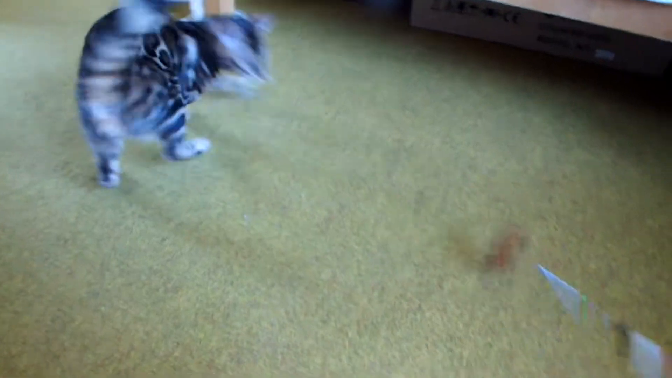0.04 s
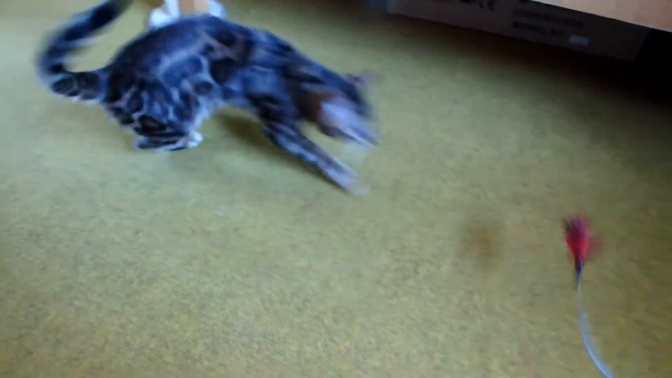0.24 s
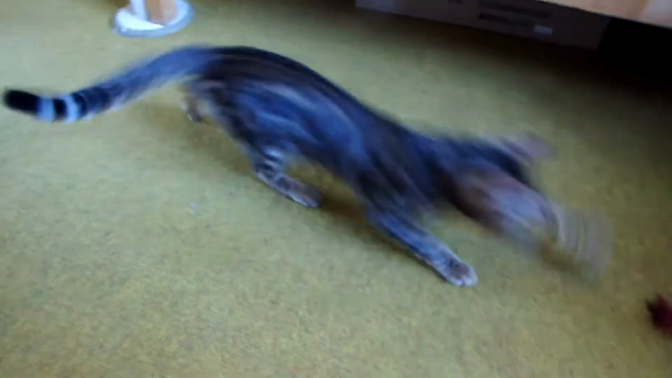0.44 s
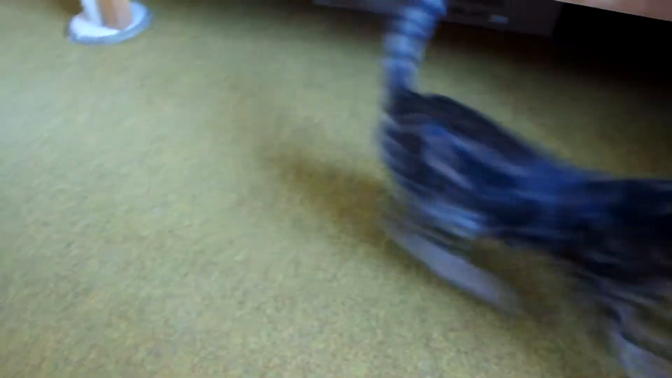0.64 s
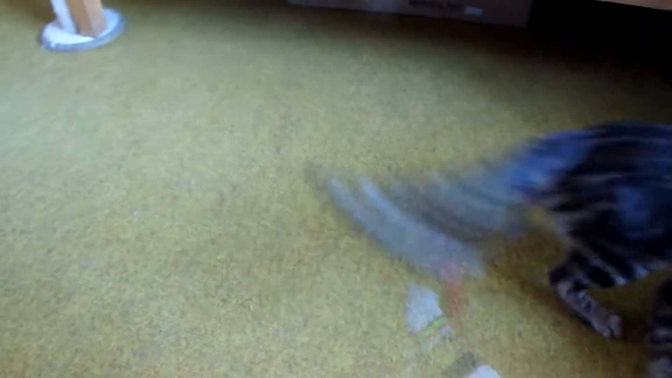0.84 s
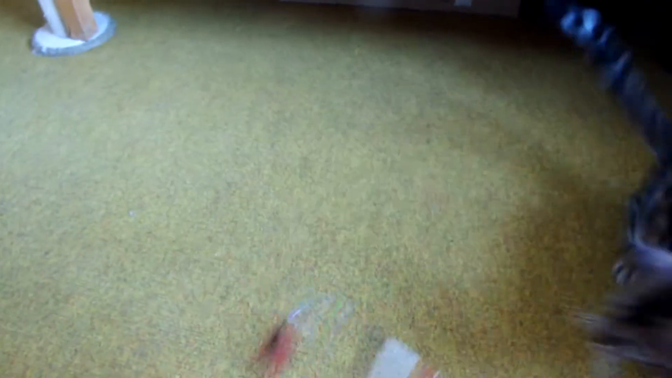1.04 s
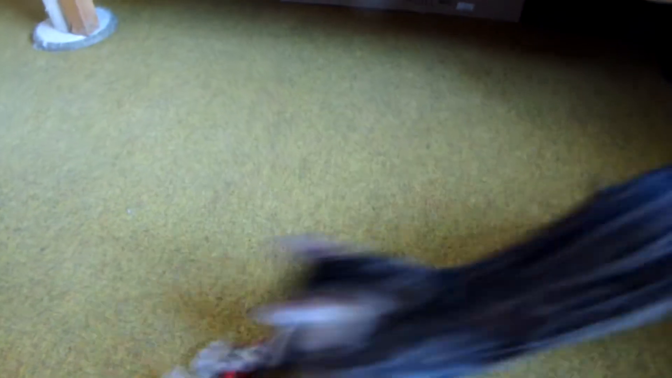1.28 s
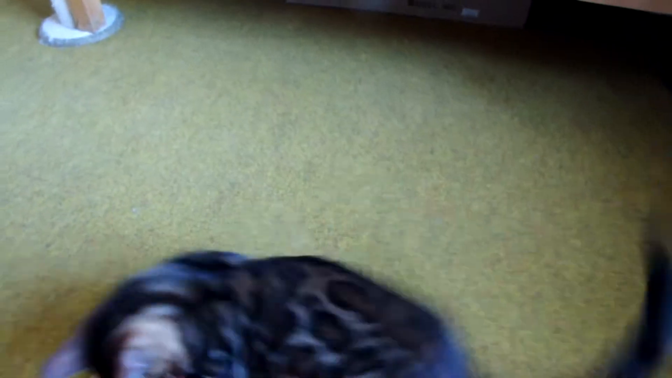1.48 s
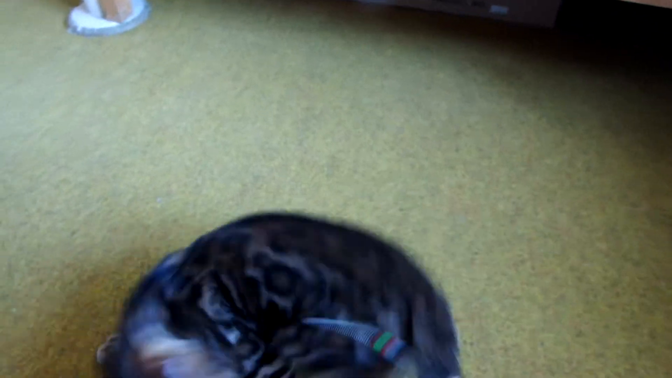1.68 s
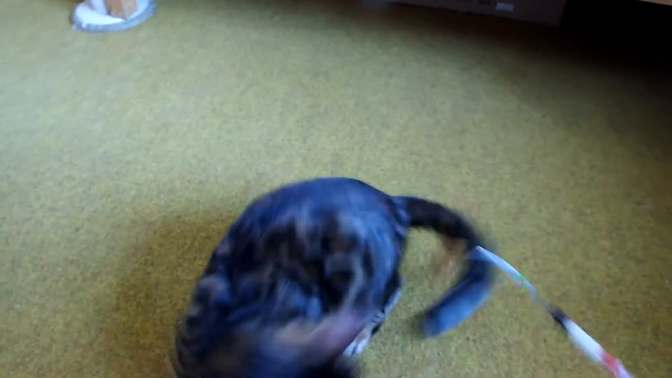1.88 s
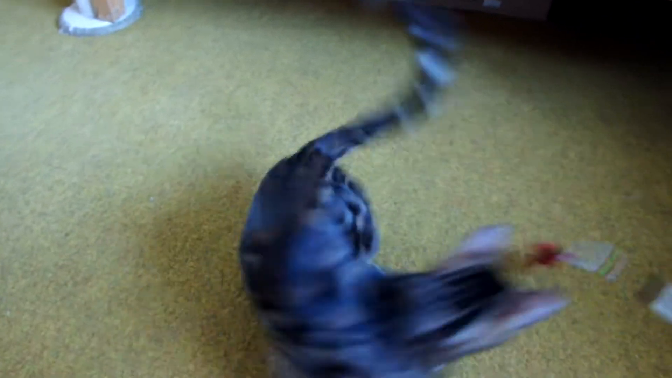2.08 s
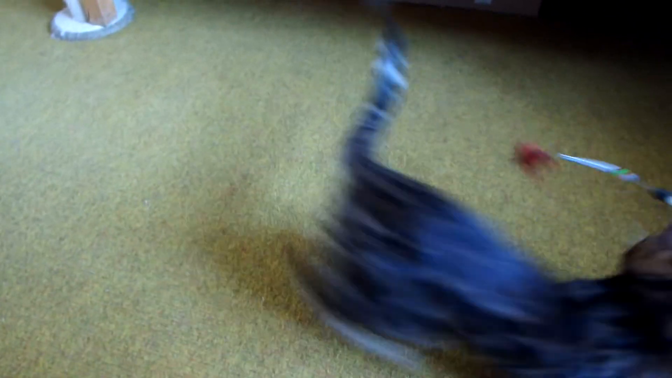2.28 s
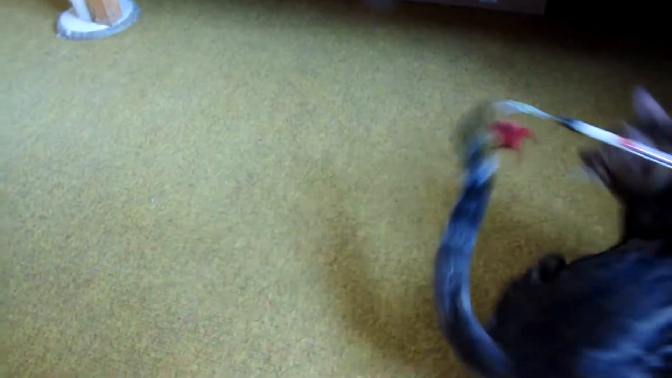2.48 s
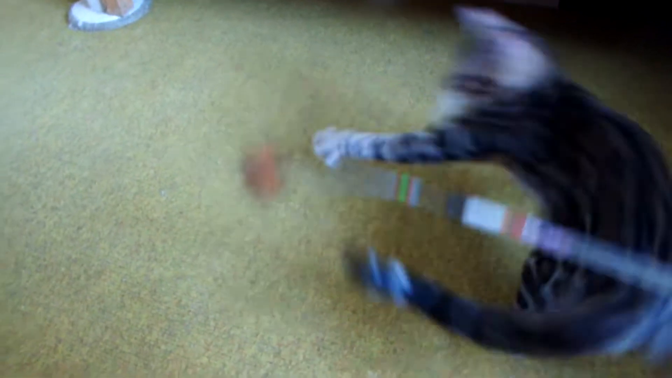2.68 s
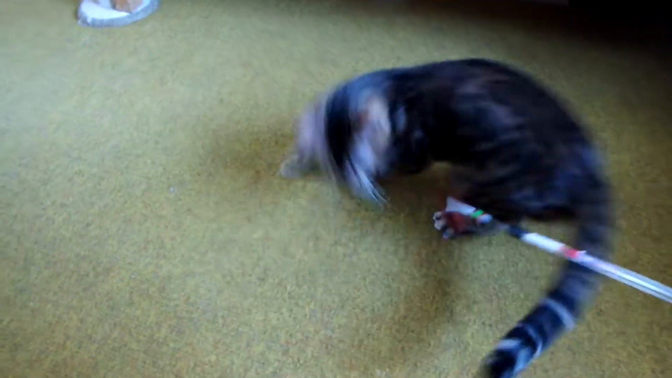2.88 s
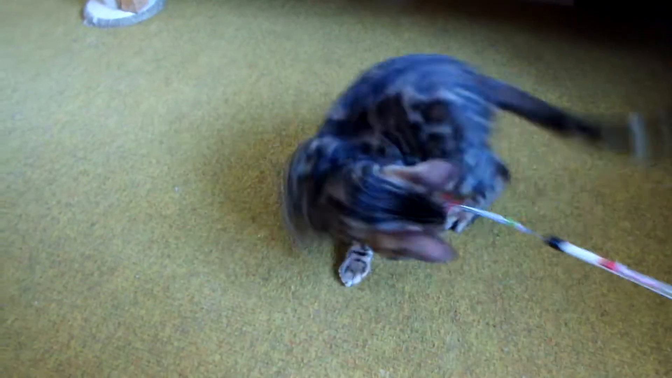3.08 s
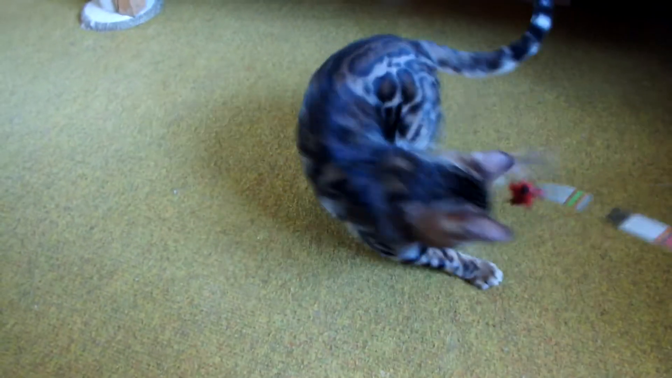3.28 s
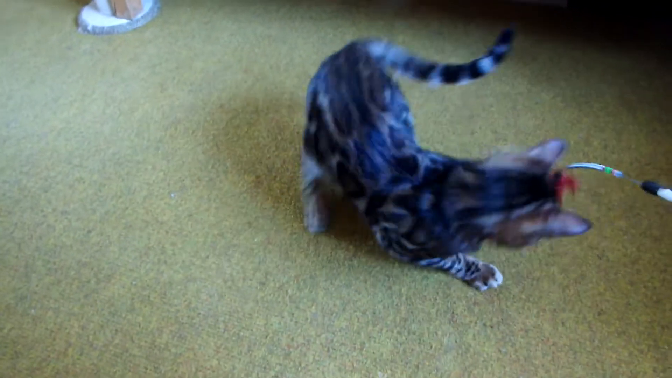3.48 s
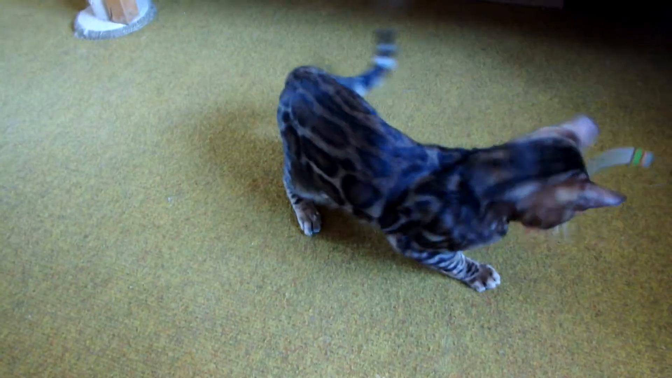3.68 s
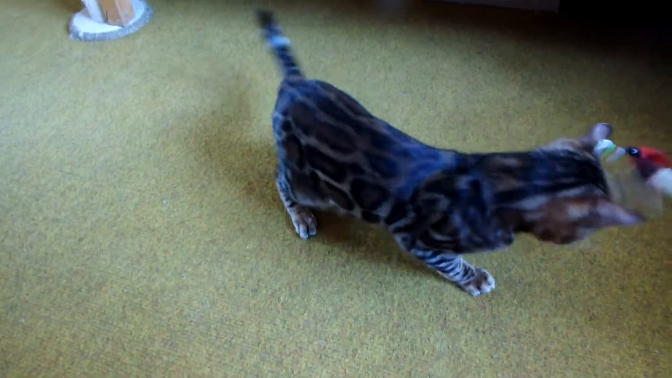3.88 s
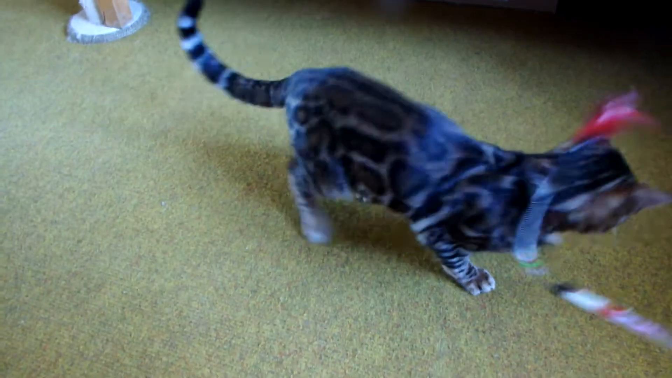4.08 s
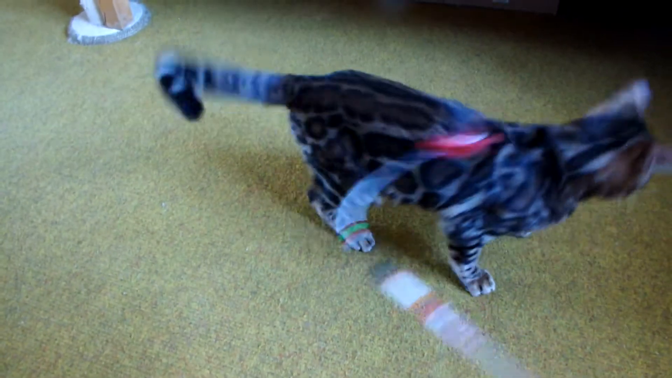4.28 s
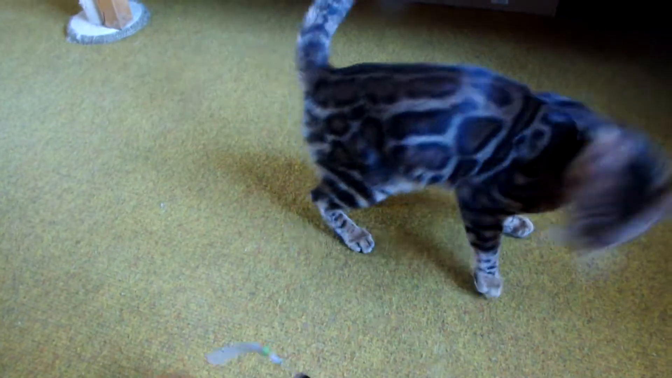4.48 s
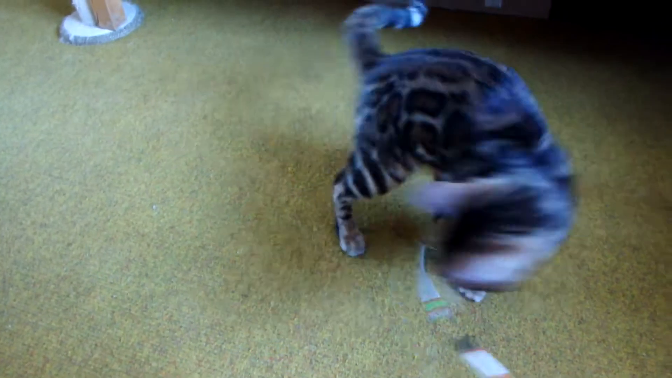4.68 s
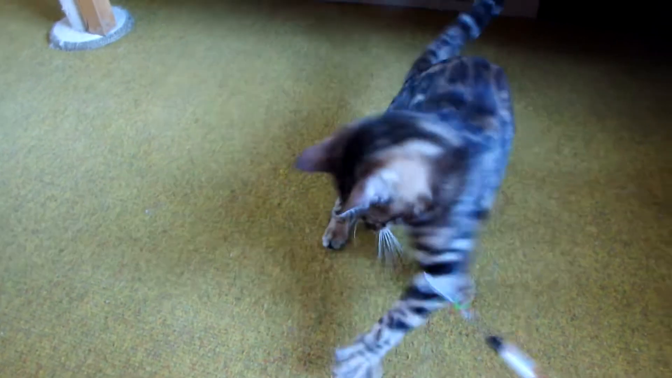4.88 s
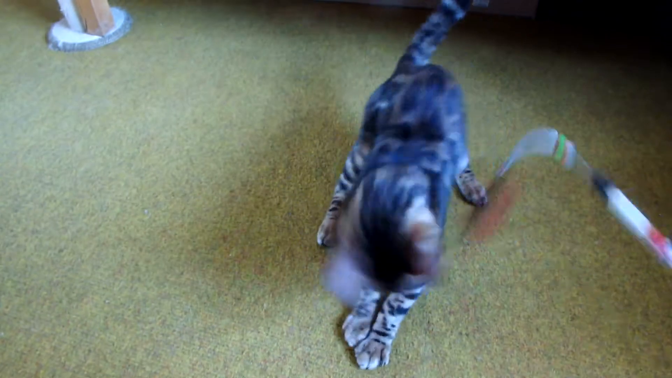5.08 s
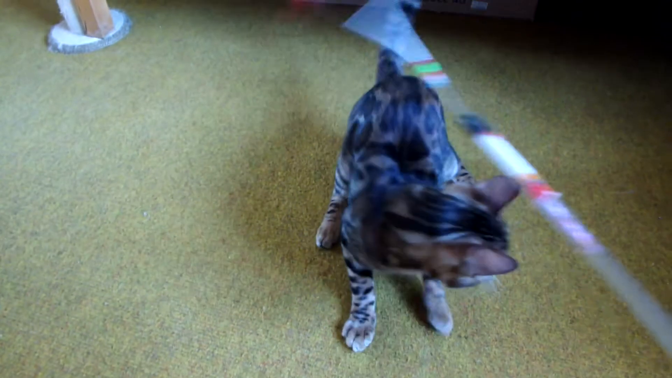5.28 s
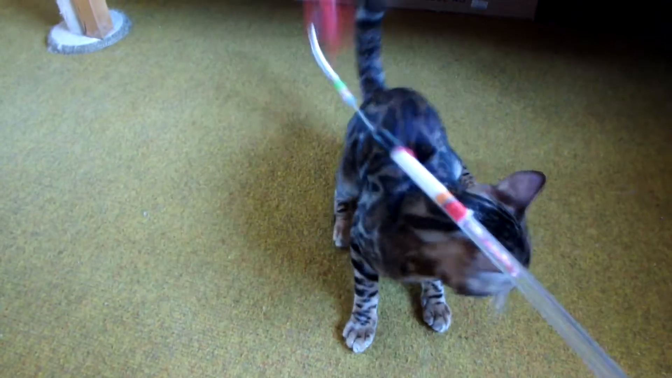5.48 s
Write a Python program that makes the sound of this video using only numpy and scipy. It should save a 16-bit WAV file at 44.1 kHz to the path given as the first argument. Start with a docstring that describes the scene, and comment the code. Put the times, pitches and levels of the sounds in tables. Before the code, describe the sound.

A quiet, dull room hiss runs throughout, with very faint carpet shuffling beneath. From 0 to 0.6 s a plastic toy strip rustles with sharp, very bright crackles. At about 0.47 s a kitten's paws begin to land: a quick cluster, then the hardest thump at 0.63 s with a loud crackle, followed by dull rubs and claw scratches until 0.9 s. More landings come at 1.0 to 1.5 s, with a strong thud at 1.34 s beside crisp crinkling and a long scratchy scuff. Softer irregular steps and faint crackles lead to firm thumps at 2.24, 2.44 and 2.74 s, with skids and scrapes to 3.1 s. Lighter taps fade by 3.5 s. The toy rustles and crackles again at 3.6 to 4.4 s and 4.6 to 5.3 s, over tiny claw ticks; two soft thumps land near 4.95 and 5.06 s, leaving hiss. Echoes are short and boxy.

```python
"""A kitten chases a wand toy over thin carpet in a small room, close to two microphones.
From the start a quiet hiss fills the room, and the toy's strip rustles and crackles: shaped noise in swells and bursts.
Faint shuffling runs below; pushing paws soon add dull rubs and bright scratches of grainy noise.
From about half a second, landings thump, with claw snaps, short skids and brief echoes off furniture and walls.
After 3.6 s the steps thin out while the toy swings twice more; two last thumps land near 5 s."""
import sys
import numpy as np
from scipy import signal
from scipy.fft import rfft, irfft, next_fast_len
from scipy.io import wavfile
from scipy.ndimage import uniform_filter1d, map_coordinates

SR = 44100
rng = np.random.default_rng(int(sys.argv[2]) if len(sys.argv) > 2 else 0)


def persist_wave(psi):
    """Save psi, clipped to +-1, as 16-bit WAV."""
    counts = np.round(np.clip(psi, -1, 1) * 32767).astype(np.int16)
    wavfile.write(sys.argv[1], SR, np.atleast_2d(counts).T)


N = 244666  # samples, about 5.5 s

# loudness of the room hiss across pitch: [f/Hz, level/dB per Hz, relative]
HISS = [(20, -20), (60, -8), (130, 0), (270, -0.5), (500, -2), (1000, -7), (1700, -5), (2500, -9.5),
        (4300, -10), (4550, -19.5), (6300, -18), (6900, -20.5), (7600, -27), (16000, -40.5)]
# how alike left and right are in the hiss: [f/Hz, likeness from -1 to 1]
HISS_ALIKE = [(60, 0.24), (150, 0.24), (380, -0.11), (950, 0.056), (2380, -0.19), (5980, -0.75),
              (15000, 0.99)]
# how alike left and right are in the room's sound: [f/Hz, likeness from -1 to 1]
ROOM_ALIKE = [(100, 0.9), (450, 0.91), (750, 0.76), (1100, 0.24), (1500, 0.54), (2500, 0.59), (4000, 0.34),
              (7000, 0.099), (12000, 0.74)]
# time the walls' echo takes to fall 60 dB: [f/Hz, t/s]
ROOM_T60 = [(150, 0.23), (500, 0.17), (900, 0.17), (2500, 0.43), (10000, 0.14)]
# low notes of floor and furniture: [f/Hz, width/Hz, level/dB]
BOOM = [(292, 15, -8.5), (419.6, 12, 0), (535, 14, -6), (664, 7.1, -1.5), (860, 15, -5.5)]

# swings of the wand: [start t/s, end t/s, rustle level at mid-swing/dB]
SWINGS = [(-.1, .62, -67.5), (1.244, 1.59, -63.5), (1.6, 2.5, -70), (3.6, 4.4, -70.5), (4.621, 5.26, -67)]
# the strip buckling hard: [t/s, level/dB before the cut all buckles share]
SNAPS = [(0.027, -35), (0.1134, -41.5), (0.1944, -35.5), (0.23, -44), (0.339, -36), (0.477, -37.5),
         (0.495, -40), (0.629, -29), (1.13, -45), (1.317, -31), (1.641, -45), (1.679, -41), (1.755, -44),
         (1.938, -41.5), (2.202, -44), (2.263, -43), (3.207, -49), (3.262, -48.5), (3.362, -49),
         (3.763, -39), (3.814, -47), (3.87, -36.5), (3.931, -41.5), (3.98, -35.5), (4.082, -47),
         (4.249, -48.5), (4.301, -46.5), (4.436, -49.5), (4.737, -35), (4.794, -46), (5.172, -50),
         (5.204, -48)]
# loudness of the plastic strip across pitch: [f/Hz, level/dB per Hz, relative]
STRIP = [(1500, -33), (4000, 1.5), (6000, -1), (8000, 1), (10000, -1.5), (12000, 0.5), (14000, -2),
         (16000, -3.5)]
# how alike left and right are in a crease's sharp sound: [f/Hz, likeness from -1 to 1]
CREASE_ALIKE = [(4000, 0.2), (12000, 0.6)]

# liveliness of the shuffling: [t/s, level/dB]
LIVELY = [(0, 0.5), (1, 2), (3, 1.5), (3.6, -9.5), (4.1, -0.5), (4.7, -2.5), (5.55, -10)]
# paws pushed through the pile, rise and fall each spanning 20 dB:
# [t of hardest push/s, rise t/s, fall t/s, pad rub level/dB, claw scratch level/dB, scratch f/Hz]
SCUFFS = [(0.36, 0.075, 0.062, -54.5, -63, 2000), (0.623, .042, .022, -38, -39.5, 1700),
          (0.662, 0.043, 0.053, -32, -45, 1800), (0.698, .04, 0.12, -51, -42.5, 2250),
          (0.734, .016, 0.031, -28.5, -61, 2000), (0.798, .018, .14, -34, -44, 1900),
          (0.852, 0.084, .13, -35.5, -43, 1800), (1.095, .11, 0.07, -43.5, -39.5, 2600),
          (1.135, 0.019, .03, -49, -48, 3000), (1.225, 0.014, 0.023, -38, -44, 1500),
          (1.42, .03, 0.14, -43, -44, 3100), (1.455, .06, 0.14, -64, -43, 4600),
          (1.478, 0.18, .13, -40, -38.5, 2450), (1.722, .021, 0.1, -37.5, -52, 1500),
          (1.86, .036, 0.18, -61, -57, 3670), (2.11, 0.07, 0.085, -51, -48, 2760),
          (2.444, .021, .1, -30.5, -42, 2570), (2.69, .04, 0.057, -51, -48.5, 1570),
          (2.796, .02, .054, -38.5, -46, 1600), (2.863, .078, .045, -62, -44, 2410),
          (2.895, .006, 0.032, -32, -45.5, 1800), (2.965, 0.057, .08, -53, -43.5, 2340),
          (3.015, .044, 0.22, -50.5, -52, 2200), (3.086, .004, 0.023, -58, -38, 1720),
          (4.173, .023, 0.033, -45, -48, 1510), (4.209, 0.019, .037, -46, -53, 1610)]
# loudness of a rubbing pad across pitch: [f/Hz, level/dB per Hz, relative]
RUB = [(100, -51), (300, -14), (420, -2.5), (520, -2.5), (750, 2), (1080, -3), (1300, -10), (1700, -12),
       (2200, -22), (5000, -43)]
# loudness of scratching claws across pitch: [f/Hz, level/dB per Hz, relative]
SCRATCH = [(400, 6), (1000, 20.5), (1600, 6), (2800, 0), (4300, -0.5), (5200, -5.5), (8000, -9.5),
           (12000, -20.5), (16000, -40)]
# loudness of the body's weight on the floor across pitch: [f/Hz, level/dB per Hz, relative]
WEIGHT = [(20, -44), (80, -18.5), (150, -7.5), (250, 3), (400, 6), (520, 4), (800, -38), (2000, -23),
          (16000, -67)]

# paws landing, levels before the shared trims in paws():
# [t/s, peak level/dB, f/Hz, claw snap level/dB, room level/dB]
LANDINGS = [(0.472, -32.5, 760, -18, 8.5), (0.484, -19.5, 785, -19, 0), (0.506, -24, 694, -22, 0),
            (0.511, -24, 910, -22, 1.5), (0.628, -9, 920, -19, -8.5), (0.733, -22, 940, -45, 0.5),
            (0.795, -26, 970, -26, 0.5), (0.867, -24, 790, -34, -6), (0.989, -21.5, 1000, -14.5, -1.5),
            (1.172, -27.5, 700, -29, -2), (1.246, -38.5, 600, -18, -9), (1.304, -20, 760, -45, 0),
            (1.314, -20, 750, -34, -8.5), (1.339, -12.5, 824, -26.5, 1.5), (1.468, -16.5, 795, -22.5, 3),
            (1.475, -17.5, 695, -38, 3.5), (1.728, -27.5, 714, -32, 5.5), (1.732, -22.5, 440, -26, -5.5),
            (1.874, -33, 650, -31, -3), (1.988, -23.5, 855, -34, 0), (2.04, -35, 835, -27, 0),
            (2.081, -37, 740, -22, -3), (2.237, -13.5, 640, -25.5, 3), (2.286, -20.5, 835, -19, 7),
            (2.436, -24, 860, -24, 2.5), (2.442, -21, 794, -21, 3.5), (2.601, -24.5, 890, -33, 0),
            (2.742, -14.5, 774, -26, 1), (2.814, -30, 910, -25, 3.5), (2.892, -30.5, 465, -26, 4),
            (2.917, -28, 810, -23, 0.5), (3.277, -26.5, 925, -45, 1), (3.281, -25, 840, -40, -1.5),
            (3.357, -24.5, 850, -32, 1.5), (3.521, -34.5, 794, -40, -1), (4.057, -44, 150, -18, 2.5),
            (4.094, -46, 150, -22, 2), (4.4, -46, 270, -39, 8), (4.954, -22, 770, -52, 0),
            (5.064, -26.5, 780, -31, -3.5)]
# loudness of a landing pad across pitch: [f/Hz, level/dB per Hz, relative]
PAD = [(20, -50), (100, -15), (250, 6), (500, 4.5), (950, 1.5), (1200, -3), (1600, 2), (2100, -16),
       (5000, -17), (16000, -44)]
# loudness of a claw snap across pitch: [f/Hz, level/dB per Hz, relative]
CLAW = [(100, -41), (500, -10), (1100, 10), (1600, 5.5), (2200, -2.5), (3000, -1), (4300, -17.5),
        (5500, -37), (10000, -42), (16000, -59)]
# where the kitten is: [t/s, lead of the right microphone/ms]
PLACE = [(0.45, 0.069), (0.63, 0.2), (1.0, 0.14), (1.338, 0.022), (1.98, 0.03), (2.25, 0.21), (2.6, 0.045),
         (5.0, 0.15)]

HISS_DB = -54.5
CRINKLES_PER_S, CRINKLE_DB = 5, 12.5  # lesser buckles in a swing; their average over its rustle, before the cut
CREASE_HZ, CREASE_SCATTER_HZ, CREASE_WIDTH_HZ = 12500, 600, 3400
BUCKLE_RISE_S, BUCKLE_T60_S, LINGER_DB, LINGER_T60_S = 0.0027, 0.027, -13, 0.2
BUCKLE_TRIM_DB = -4.5  # the cut all buckles share
SHUFFLE_DB, SHUFFLE_SCRATCH_DB, SHUFFLE_SWING_DB = -63.5, -61.5, 1.5  # faint shuffling between the steps
SKID_HZ, SHUFFLE_HZ = 1700, 1900  # slow strokes scratch low
SCUFF_WEIGHT_DB, WEIGHT_PER_RUB_DB = -41, 0.23  # the body bears down on a rubbing pad
SKID_DB, SKID_PER_DB, SKID_RISE_S, SKID_FALL_S = -34, 0.5, 0.012, 0.06  # skids are harder after hard landings
SKID_SCRATCH_DB = -9.5  # claws against pad in a skid
PAD_WIDTH_HZ, CLAW_T60_S = 335, 0.0074  # the floor's damping; how long claws catch
WEIGHT_DB, WEIGHT_PER_DB = -27, -0.5  # body weight at a listed 0 dB; gentle steps are duller than hard ones
PAN_DB, PAN_DB_PER_MS = 1, -10  # left over right; the level leans rightward as the right microphone's lead grows
BALANCE_DB = 0.8  # the left microphone is a little more sensitive
TOP_HZ = 15950


def amp(db):
    """Turn decibels into a gain."""
    return 10 ** (np.asarray(db) / 20)


def unit(x):
    """Scale x to an rms (average strength) of 1."""
    return x / np.sqrt(np.mean(x ** 2) + 1e-20)


def size(x):
    """Root of the total energy, averaged over channels."""
    return np.sqrt(np.mean(np.sum(x ** 2, axis=-1)) + 1e-20)


def along(points, hz):
    """Read (Hz, value) points at any pitch, on a log axis."""
    f, v = np.transpose(points)
    return np.interp(np.log(hz + 1), np.log(f + 1), v)


def shape(points):
    """Turn a table of levels into a gain for every pitch."""
    return lambda hz: amp(along(points, hz))


def wobble(rate):
    """A smooth random curve with this many knots a second."""
    knots = rng.standard_normal(int(N * rate / SR) + 4)
    return map_coordinates(knots, [np.arange(N) * rate / SR])


def filtered(x, response):
    """Change the strength or timing of each pitch in x."""
    n = x.shape[-1]
    m = next_fast_len(n + 4096)  # spare room for the filter's tail
    return irfft(rfft(x, m) * response(np.fft.rfftfreq(m, 1 / SR)), m)[..., :n]


def impulse(gain, count=4096):
    """A click of energy 1 that starts at once and has this gain at each pitch, up to one overall factor."""
    cepstrum = irfft(np.log(gain(np.fft.rfftfreq(count, 1 / SR))))
    forward_half = np.arange(count) < count // 2
    click = irfft(np.exp(rfft(2 * cepstrum * forward_half)))
    return click / size(click)


def resonance(f, hz, width):
    """How one damped ringing note responds to each pitch."""
    return 1j * f * width / (hz * hz - f * f + 1j * f * width)


def boom(f):
    """Floor and furniture favour a few low notes."""
    return 1 + sum(amp(db) * resonance(f, centre, width) for centre, width, db in BOOM)


def spread(pair, alike):
    """Mix two unrelated signals to left and right with the given likeness."""
    turn = lambda hz: np.arccos(np.clip(along(alike, hz), -1, 1)) / 2
    mid, side = filtered(pair, lambda hz: np.array([np.cos(turn(hz)), np.sin(turn(hz))]))
    return np.array([mid + side, mid - side])


def rush(spectrum, alike, grain_db=0, grain_rate=300, patchy_db=2):
    """Stereo noise of rms 1, in grains of uneven strength, its colour shifting in patches."""
    pair = rng.standard_normal((2, N)) * amp(grain_db * wobble(grain_rate))
    z = signal.stft(pair, nperseg=512)[2]
    field = uniform_filter1d(rng.standard_normal(z.shape[1:]), size=5, axis=0)  # smooth across pitch
    field = uniform_filter1d(field, size=8, axis=1)  # smooth across time
    pair = signal.istft(z * amp(patchy_db * unit(field)), nperseg=512)[1][:, :N]
    return unit(spread(filtered(pair, shape(spectrum)), alike))


def add(track, s, sound):
    """Mix a stereo sound into the track at time s."""
    part = track[:, max(round(s * SR), 0):][:, :sound.shape[-1]]
    part += sound[:, :part.shape[-1]]


def hiss():
    """Quiet noise, strongest at low pitch, fills the room throughout."""
    return amp(HISS_DB) * rush(HISS, HISS_ALIKE, patchy_db=2.5)


def crinkles(count=12):
    """Lesser buckles fall at random within each swing, as rows like those of SNAPS."""
    rows = []
    for start, end, db in SWINGS:
        times = start + (np.arange(count) + rng.random(count)) / CRINKLES_PER_S
        levels = db + CRINKLE_DB + rng.normal(0, 3.9, count)
        rows += [(s, level) for s, level in zip(times, levels) if 0 < s < end]
    return rows


def toy():
    """The plastic strip rustles as it swings and buckles in short bright crackles that linger in the room."""
    creases = rush(STRIP, CREASE_ALIKE, grain_db=4.0, grain_rate=900, patchy_db=1.5)
    diffuse = rush(STRIP, ROOM_ALIKE, grain_db=5.0, grain_rate=250, patchy_db=3.5)
    # the strip speeds up and slows down in one arch for each swing
    speed = np.zeros(N)
    for start, end, db in SWINGS:
        progress = np.clip((np.arange(N) / SR - start) / (end - start), 0, 1)
        speed += amp(db) * np.sin(np.pi * progress)
    track = speed * diffuse
    t = np.arange(SR // 4) / SR
    buckle = amp(-60 * t / BUCKLE_T60_S) * (1 - np.exp(-t / BUCKLE_RISE_S))
    linger = amp(LINGER_DB - 60 * t / LINGER_T60_S) * (1 - np.exp(-t / 0.0056))
    for s, db in SNAPS + crinkles():
        patch = rng.integers(N - len(t)) + np.arange(len(t))  # a random stretch of the noise
        hz = CREASE_HZ + CREASE_SCATTER_HZ * rng.standard_normal()  # each crease rings around its own pitch
        ring = lambda f: 0.38 + np.abs(resonance(f, hz, width=CREASE_WIDTH_HZ))
        tint = lambda x: unit(filtered(x[:, patch], ring))
        crackle = buckle * tint(creases) + linger * tint(diffuse)
        add(track, s, amp(db + BUCKLE_TRIM_DB) * crackle)
    return track


def skids():
    """A landing paw skids on in a short stroke, as rows like those of SCUFFS."""
    rows = []
    for s, landing_db, *_ in LANDINGS:
        rub_db = SKID_DB + SKID_PER_DB * landing_db
        rows.append((s + SKID_RISE_S, SKID_RISE_S, SKID_FALL_S, rub_db, rub_db + SKID_SCRATCH_DB, SKID_HZ))
    return rows


def carpet():
    """Sliding pads rub the floor dully while claws catch fibre after fibre; each push swells and dies."""
    t = np.arange(N) / SR
    rub = unit(filtered(rush(RUB, ROOM_ALIKE, grain_db=2.5, grain_rate=340), boom))
    scratch = rush(SCRATCH, ROOM_ALIKE, grain_db=3.0, grain_rate=550)
    weight = rush(WEIGHT, ROOM_ALIKE)
    # favour the pitches around hz
    rasp = lambda x, hz: unit(filtered(x, lambda f: 0.39 + np.abs(resonance(f, hz, width=0.29 * hz))))
    lively_db = np.interp(t, *np.transpose(LIVELY))
    shuffle = amp(SHUFFLE_DB) * weight + amp(SHUFFLE_SCRATCH_DB) * rasp(scratch, SHUFFLE_HZ)
    track = amp(lively_db + SHUFFLE_SWING_DB * wobble(14)) * shuffle
    for s, rise, fall, rub_db, scratch_db, hz in SCUFFS + skids():
        near = t[(t > s - 3 * rise) & (t < s + 3 * fall)]
        push = amp(-20 * np.maximum((s - near) / rise, (near - s) / fall))
        patch = (np.round(near * SR).astype(int) + rng.integers(N)) % N  # every paw meets fresh pile
        pad = amp(rub_db) * rub[:, patch]
        claws = amp(scratch_db) * rasp(scratch[:, patch], hz)
        body = amp(SCUFF_WEIGHT_DB + WEIGHT_PER_RUB_DB * rub_db) * weight[:, patch]
        add(track, near[0], push * (pad + claws + body))
    return track


def ports(sound, s):
    """The direct sound reaches the two microphones at times and levels set by the kitten's place."""
    lead_ms = np.interp(s, *np.transpose(PLACE))
    lead_s = lead_ms / 1000
    pan_db = PAN_DB + PAN_DB_PER_MS * lead_ms
    shift = lambda hz: np.exp(np.outer([-1, 1], 1j * np.pi * hz * lead_s))  # left later, right earlier
    return amp([[pan_db / 2], [-pan_db / 2]]) * filtered(sound, shift)


def room(sound, early_db, early_t60, gap, count=9):
    """The room's answer, as strong as the sound: random single echoes off near furniture, then the walls."""
    n = len(sound)
    hz, t, z = signal.stft(rng.standard_normal((2, n)), SR, nperseg=256)
    fade = amp(-60 * t / along(ROOM_T60, hz)[:, None])
    walls = signal.istft(z * fade, SR, nperseg=256)[1][:, :n]
    walls *= 1 - np.exp(-np.arange(n) / SR / 0.0058)  # the walls' echo takes a moment to build
    delay = gap * (1 + np.arange(count) + rng.random((2, count)))
    strength = rng.choice([-1, 1], delay.shape) * amp(-60 * delay / early_t60)
    echoes = np.array([np.bincount((d * SR).astype(int), g, n) for d, g in zip(delay, strength)])
    tail = spread(walls / size(walls) + amp(early_db) * echoes / size(echoes), ROOM_ALIKE)
    answer = filtered(signal.fftconvolve(tail, sound[None], axes=1)[:, :n], boom)
    return answer * size(sound) / size(answer)


def paws():
    """Each landing rings the damped floor for a few cycles, with the body's weight below and a claw snap above."""
    track, t = np.zeros((2, N)), np.arange(SR // 3) / SR
    for s, db, hz, claw_db, room_db in LANDINGS:
        # the soft pad and the pile let the ring build up over one cycle
        pad = lambda f: np.abs(resonance(f, hz, width=PAD_WIDTH_HZ)) ** 2 * shape(PAD)(f)
        body = lambda f: amp(WEIGHT_DB + WEIGHT_PER_DB * db) * shape(WEIGHT)(f)
        thud = impulse(lambda f: pad(f) + body(f))
        thud = np.pad(thud, (0, len(t) - len(thud)))
        catch = rng.standard_normal(len(t)) * amp(-60 * t / CLAW_T60_S)
        claws = signal.fftconvolve(catch, impulse(shape(CLAW)))[:len(t)]
        claws = amp(claw_db + 12.0) * claws / size(claws)
        # soft furnishings swallow much of the claws' snap
        spill = thud + amp(-11) * claws
        answer = room(spill, early_db=1.5, early_t60=0.087, gap=0.0028)
        force = amp(db + 2.0) / np.abs(thud).max()
        add(track, s, force * (ports(thud + claws, s) + amp(room_db - 1.0) * answer))
    return track


def scene():
    """Room hiss, toy, carpet and paws together, heard by two slightly unequal microphones."""
    dry = hiss() + toy() + carpet() + paws()
    return dry * amp([[BALANCE_DB / 2], [-BALANCE_DB / 2]])


def record(dry):
    """The camera keeps nothing above its band limit."""
    return filtered(dry, lambda hz: hz < TOP_HZ)


dry = scene()
out = record(dry)
persist_wave(out)
```